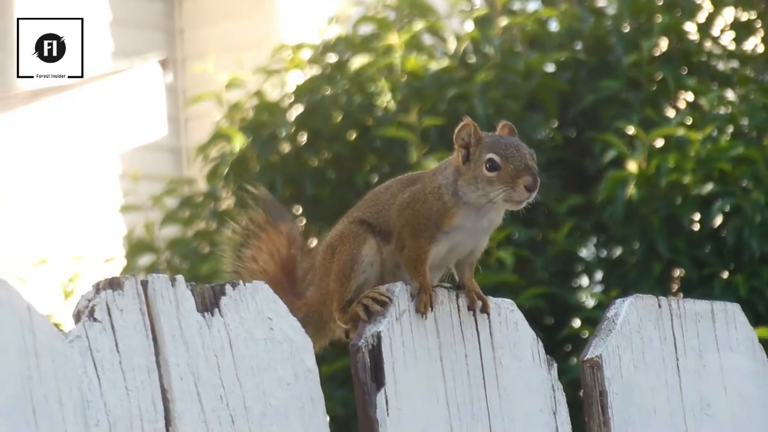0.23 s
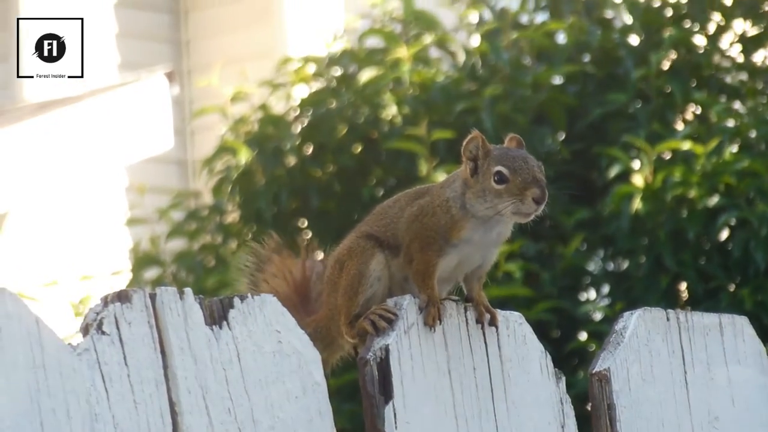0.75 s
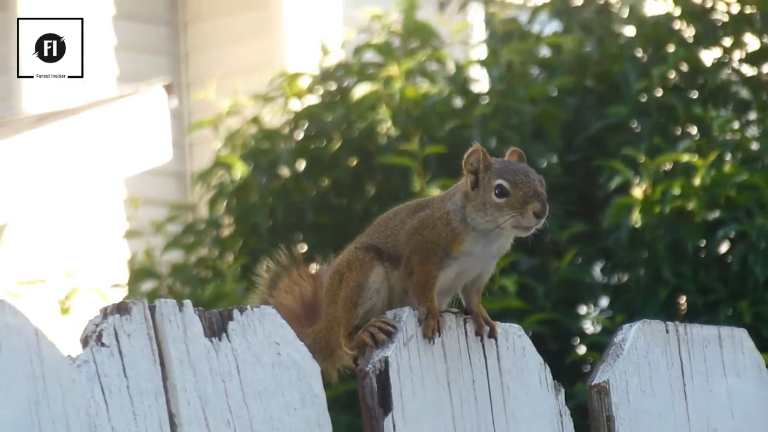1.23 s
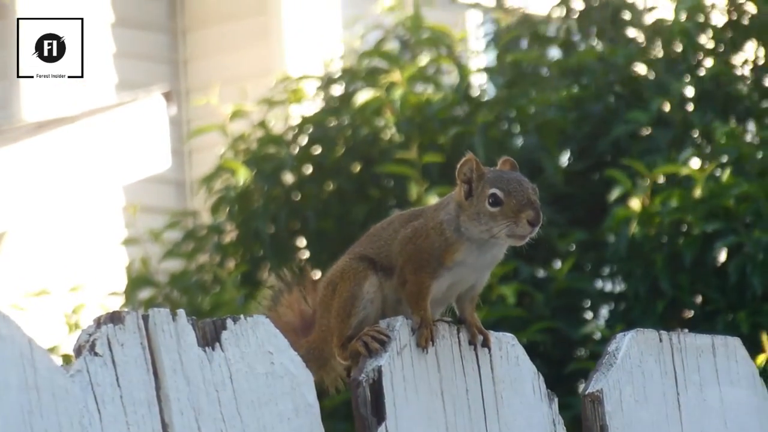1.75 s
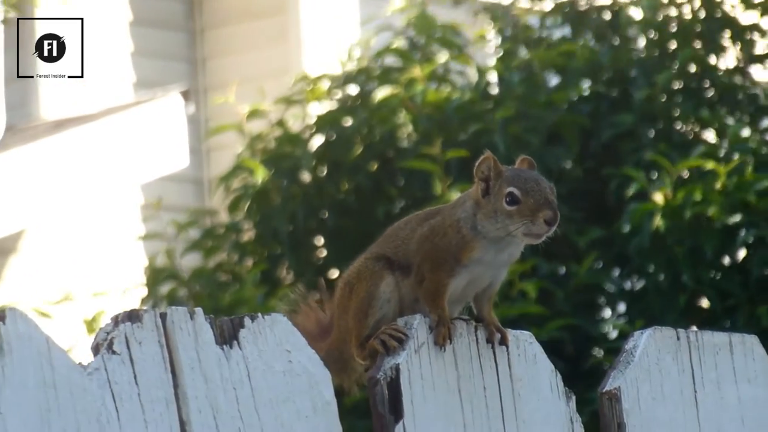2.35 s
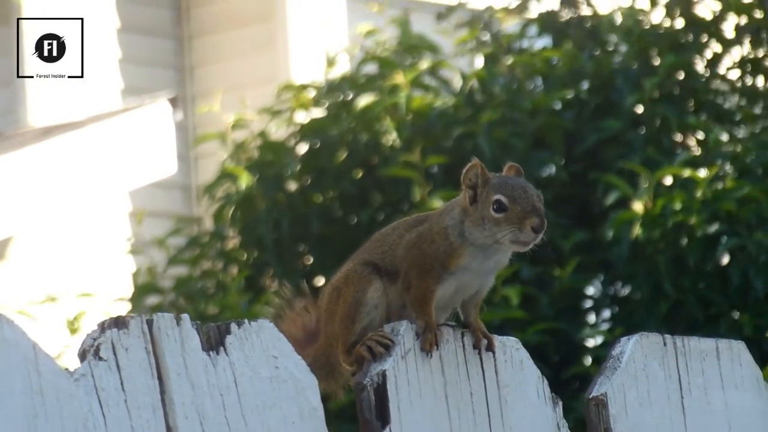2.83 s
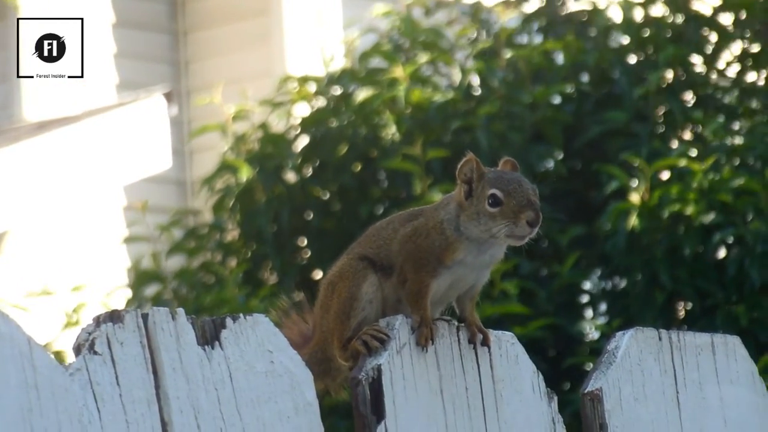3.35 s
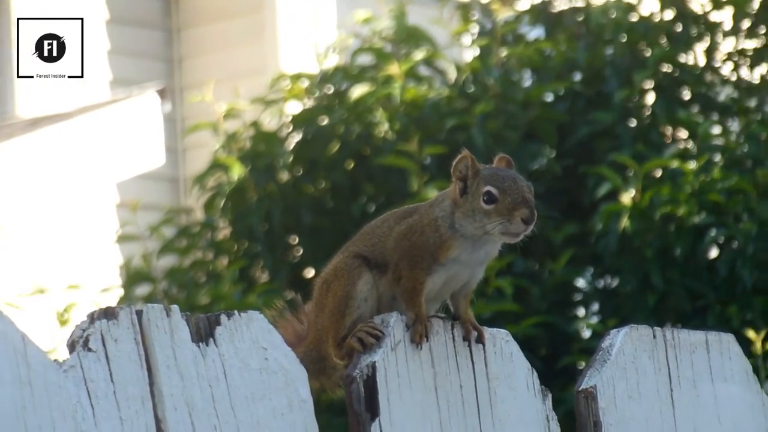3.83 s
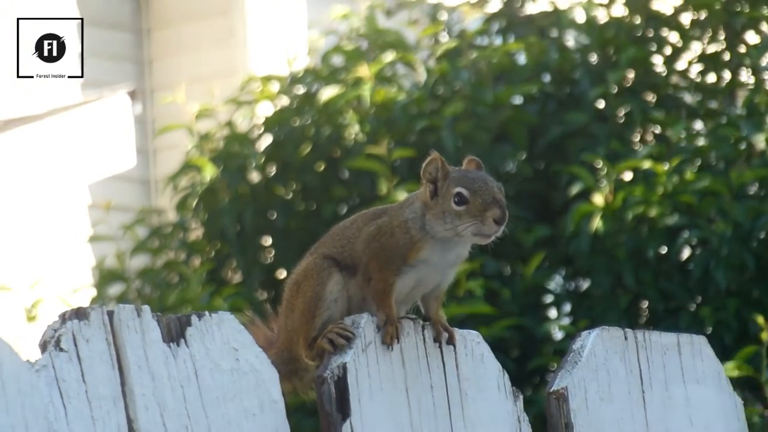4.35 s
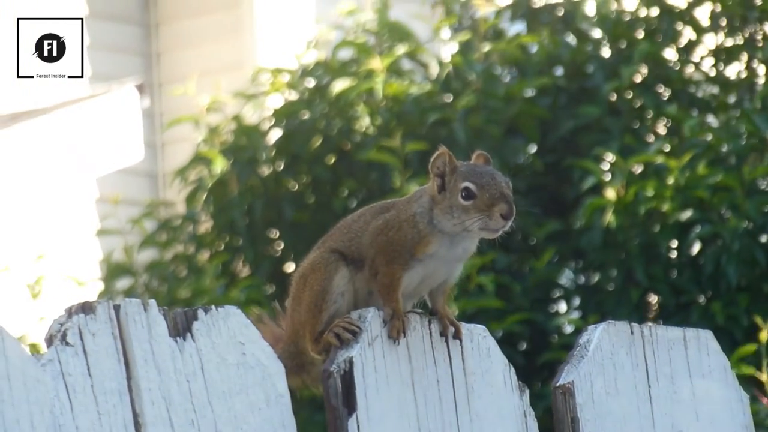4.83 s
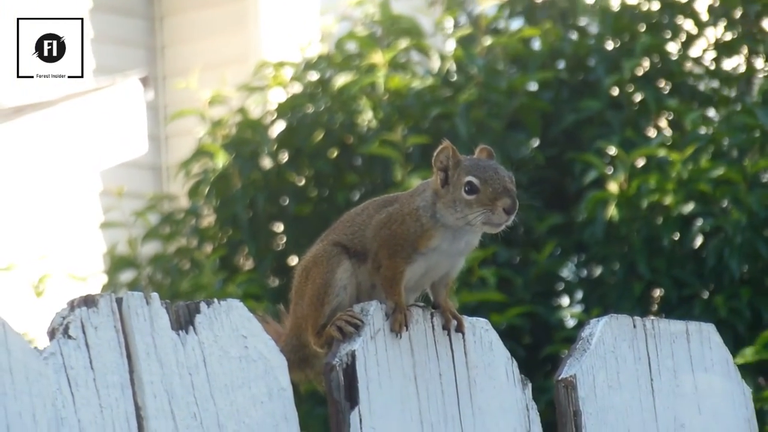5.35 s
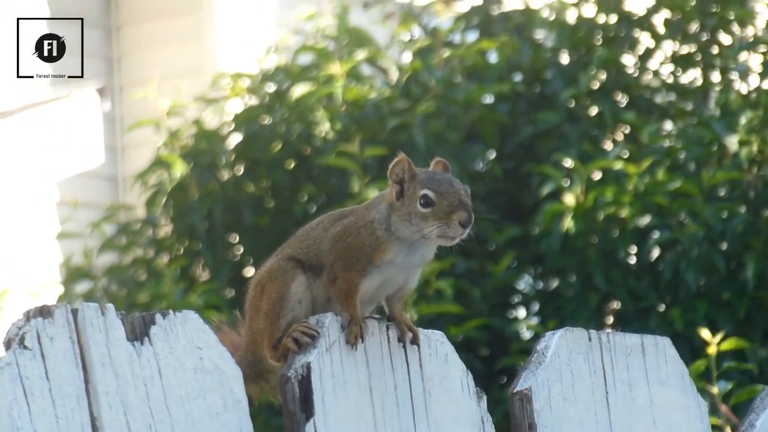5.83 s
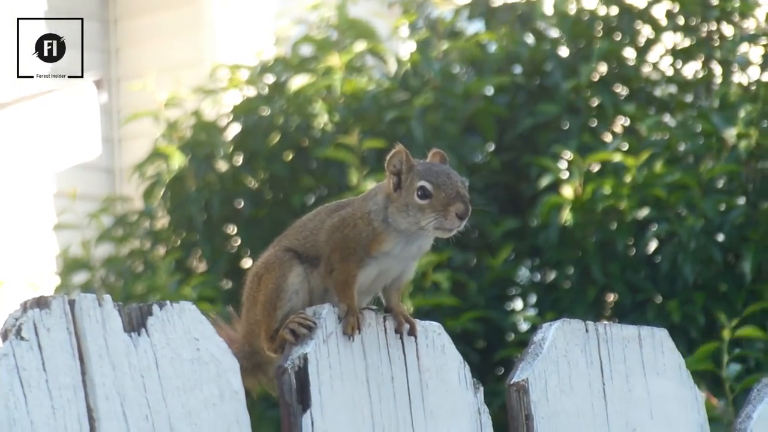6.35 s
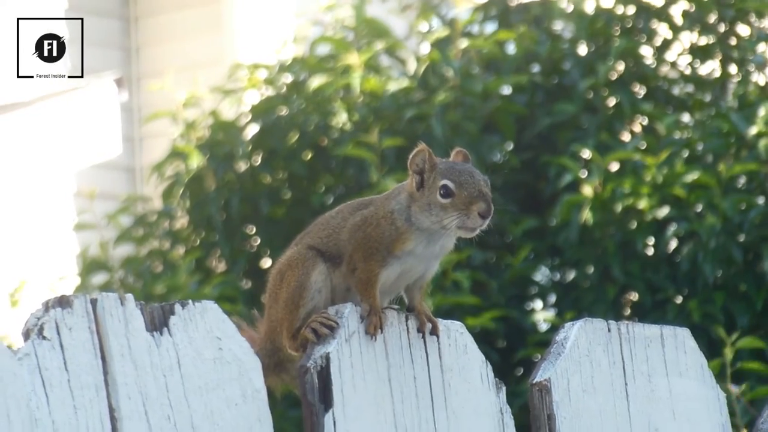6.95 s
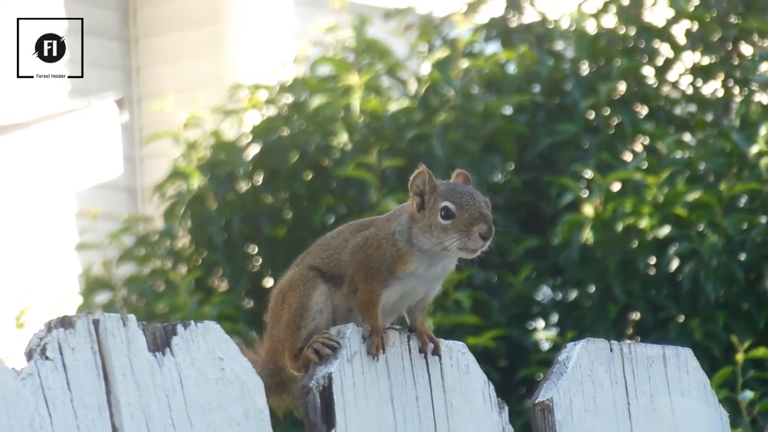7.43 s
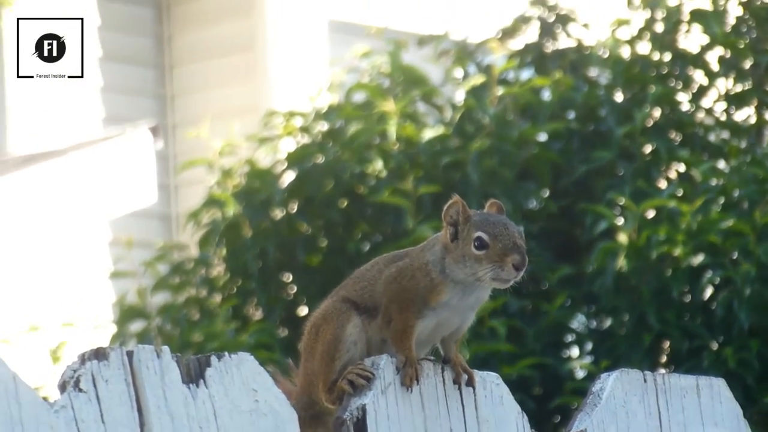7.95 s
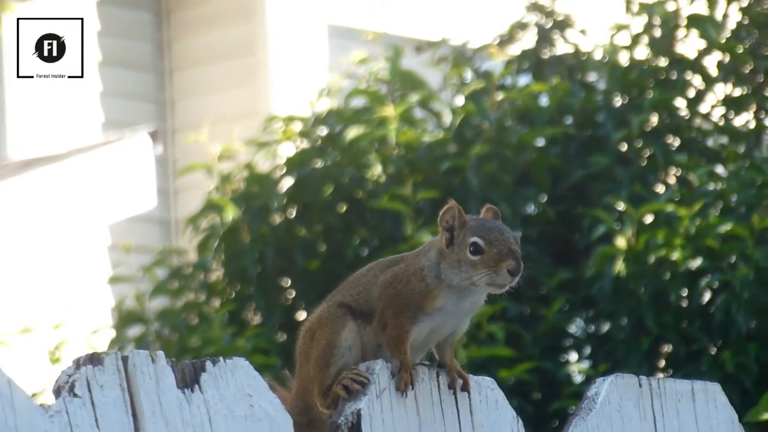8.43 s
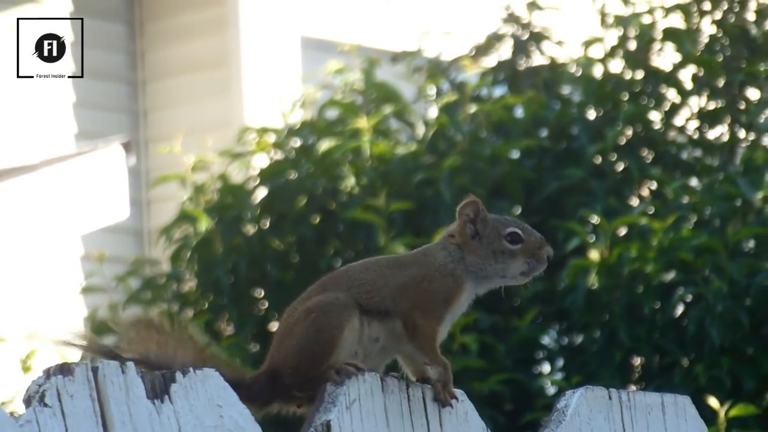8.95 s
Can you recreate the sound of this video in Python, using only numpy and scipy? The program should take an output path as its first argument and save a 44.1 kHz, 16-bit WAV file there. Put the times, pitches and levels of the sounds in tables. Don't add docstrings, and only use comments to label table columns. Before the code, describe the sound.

A close stereo camera microphone outdoors hears a squirrel scolding from a wooden fence, house walls returning short bright echoes. At 0-0.5 s finger taps, low wind thumps, a brief dropout and a loud clicky scrap accompany the first calls. Each call lasts about a tenth of a second: a thin whistle scooping up near 6 kHz, sometimes cracking into a higher hoarse yelp, usually ending in a raspy bark. They come two or three per second at first. Faint dry insect ticks run at 1.2 and 2 s; claws scratch boards at 1.2, 2.2 and 2.6 s. From 2.6 to 3.1 s a soft nasal whine rises, holds and sinks. Calls continue less regularly, weaker and huskier after 5 s. Wind pops at 5.1 and 6.1 s, then buffets heavily from 6.7 to 7.9 s, easing with smaller thumps until 8.5 s. Final chirps and a bark close near 9 s over distant town hum and faint hiss.

```python
import sys
import numpy as np
from scipy import signal
from scipy.fft import rfft, irfft, next_fast_len
from scipy.io import wavfile
from scipy.ndimage import uniform_filter1d, map_coordinates

SR = 44100
rng = np.random.default_rng(int(sys.argv[2]) if len(sys.argv) > 2 else 0)


def field_ratio(decibels):
    return 10 ** (np.asarray(decibels, dtype=float) / 20)


def pcm_store(signal):
    levels = np.round(np.clip(np.atleast_2d(signal), -1, 1) * 32767)
    wavfile.write(sys.argv[1], SR, levels.astype(np.int16).T)


N = 405279
T = np.arange(N) / SR


def unit(x):
    return x / np.sqrt(np.mean(x ** 2) + 1e-20)


def along(points, hz):
    f, v = np.transpose(points)
    return np.interp(np.log(hz + 1), np.log(f + 1), v)


def wobble(rate):
    return unit(map_coordinates(rng.standard_normal(int(N * rate / SR) + 4), [T * rate]))


def filtered(x, response):
    m = next_fast_len(N + SR // 2)
    return irfft(rfft(x, m) * response(np.fft.rfftfreq(m, 1 / SR)), m)[..., :N]


def resonant(x, modes, order=1):
    def body(f):
        total = 0
        for k, (centre, width, db) in enumerate(modes):
            ring = 1j * f * width / (centre * centre - f * f + 1j * f * width)
            total = total + (-1) ** k * field_ratio(db) * ring ** order
        return total
    return unit(filtered(x, body))


def swell(s, length, rise, fall):
    at = np.arange(round(s * SR), min(N, round((s + length + 8 * fall) * SR)))
    t = at / SR - s
    return at, t, np.clip(t / rise, 0, 1) * np.exp(-np.clip(t - length, 0, None) / fall)


def rush(spectrum, alike, patchy_db):
    z = signal.stft(rng.standard_normal((2, N + 512)), nperseg=512)[2]
    field = uniform_filter1d(rng.standard_normal(z.shape[1:]), size=6, axis=0)
    field = uniform_filter1d(field, size=14, axis=1)
    pair = signal.istft(z * field_ratio(patchy_db * unit(field)), nperseg=512)[1][:, :N]

    def shape(hz):
        turn = np.arccos(np.clip(along(alike, hz), -1, 1)) / 2
        return field_ratio(along(spectrum, hz)) * [np.cos(turn), np.sin(turn)]
    mid, side = filtered(pair, shape)
    return unit(np.array([mid + side, mid - side]))


def mottled(x, depth_db):
    z = signal.stft(x, nperseg=512)[2]
    field = uniform_filter1d(uniform_filter1d(rng.standard_normal(z.shape), size=5, axis=0), size=7, axis=1)
    return signal.istft(z * field_ratio(depth_db * unit(field) - 1), nperseg=512)[1][:N]


def ports(pan_db):
    return np.array([[min(pan_db, 0)], [min(-pan_db, 0)]])


# time in seconds, level in dB.
BUSTLE = [(0.0, -50), (1.02, -52), (2.1, -51.5), (2.7, -51), (3.5, -55.5), (4.5, -57), (5.3, -54.5),
          (7.01, -55), (9.19, -54)]
# frequency in Hz, level in dB per Hz.
HUM_COLOUR = [(12, -42.5), (20, -14.5), (262, -6.5), (390, -5), (426, -3.5), (556, -7.5), (650, -1.5),
              (926, -4.5), (1110, -5), (3070, -16.5), (4000, -29.5), (5200, -58.5), (8800, -120)]
# frequency in Hz, level in dB per Hz.
HISS_COLOUR = [(1760, -33.5), (3000, -6), (3340, -4.5), (4900, -6.5), (5430, -9), (7300, -11), (10800, -15),
               (13700, -17), (15000, -41)]
# frequency in Hz, likeness from 0 to 1.
LIKENESS = [(60, 0.9), (640, 0.89), (1400, 0.73), (3000, 0.44), (6000, 0)]


def town():
    bustle_db = np.interp(T, *np.transpose(BUSTLE))
    hum = field_ratio(bustle_db - 0.78 + 0.44 * wobble(4.4)) * rush(HUM_COLOUR, LIKENESS, patchy_db=2.0)
    hiss = field_ratio(bustle_db - 10.5) * rush(HISS_COLOUR, LIKENESS, patchy_db=4.5)
    phase = np.array([[0], [1]]) + .5 * wobble(60)
    line = field_ratio(-75.5 + 2 * wobble(12)) * np.sin(2 * np.pi * 13194 * T + phase)
    return hum + hiss + line


# time in seconds, level in dB.
BREEZE_LEVEL = [(0.0, -54), (0.33, -53), (0.43, -61.5), (0.97, -73.5), (1.61, -68), (2.38, -72.5),
                (6.04, -67.5), (6.19, -60.5), (6.58, -60), (6.89, -52), (7.22, -59), (7.5, -49),
                (7.68, -48), (7.98, -54.5), (8.27, -57), (9.19, -73.5)]
# time in seconds, peak in dB, left-right difference in dB.
SOFT_GUSTS = [(0.0, -44, 6), (0.68, -55.5, 1), (0.82, -56, 27), (4.57, -58, -4.5), (4.76, -53, 3),
              (6.3, -58.5, 13.5), (6.959, -36.5, 15), (7.161, -43.5, 21), (7.531, -28.5, -15),
              (7.82, -38.5, -3.5), (8.62, -54.5, 4.5), (8.95, -51, 2)]
# time in seconds, peak in dB, pitch in Hz, left-right in dB.
BURSTS = [(0.073, -31.5, 131, 19), (0.155, -18.5, 164, 2), (0.262, -21, 220, 13), (0.326, -24, 200, 24),
          (0.443, -32.5, 233, 8), (2.037, -33, 130, 15), (2.114, -41, 120, 24), (4.778, -43.5, 230, 7),
          (5.148, -32, 128, 13), (6.085, -31, 205, 14.5), (6.183, -34, 103, 8), (6.193, -23.5, 274, 24),
          (6.548, -34.5, 170, 19), (6.635, -46, 167, 13), (6.724, -16.5, 330, -26),
          (6.857, -33.5, 127.3, 8), (6.943, -22, 233, 27), (7.142, -29.5, 292, 29), (7.268, -28, 217, 29),
          (7.347, -29, 185.6, 27), (7.422, -25.5, 192, 39), (7.733, -17, 450, -28), (8.119, -31.5, 137, -9),
          (8.279, -38, 192, -13.5), (8.332, -30, 250, 35.5), (8.377, -36.5, 152, -4), (8.486, -39, 268, 22)]
# time in seconds, peak in dB, pitch in Hz, left-right in dB.
DIPS = [(0.148, -36, 150, 5), (0.1683, -23.5, 196, 10), (0.258, -27, 306, -15), (0.287, -39, 213, -13),
        (0.3007, -24, 285, -21), (0.31, -37, 230, 10), (0.361, -31, 294, -23), (6.241, -29, 290, 23),
        (6.2627, -29.5, 283, 20.5), (6.7362, -23, 382, -13), (6.747, -27, 185, -8), (6.754, -29, 262, 12),
        (6.7802, -28.5, 377, 18), (6.8065, -26.5, 254, 23), (6.925, -21, 312, 19), (6.957, -21, 330, 22),
        (6.9647, -25, 290, 20), (6.976, -38, 167, 16), (7.026, -31, 181, 18), (7.1688, -24, 320, 20.5),
        (7.1777, -24, 368, 25), (7.3253, -29.5, 237, 14), (7.374, -29, 277, 16), (7.384, -32, 193, 22),
        (7.3936, -37, 272, 19), (7.4397, -30.0, 237, 18), (7.463, -28, 233, 6), (7.488, -34, 114, -18),
        (7.494, -23, 253, -17), (7.5145, -22, 417, -18), (7.5267, -20, 408, -19), (7.5393, -19, 370, -24),
        (7.5528, -21, 313, -16), (7.5603, -21, 387, -23), (7.5754, -21.5, 334, -25),
        (7.5827, -32, 408, -21), (7.603, -25, 294, -19), (7.6313, -29, 165, 17), (7.662, -30, 212.4, -12),
        (7.73, -38, 253, -5), (7.755, -24, 130, -14), (7.7602, -22, 283, -21), (7.771, -19.5, 368, -15),
        (7.783, -30.5, 387, 5), (7.793, -27, 262, 8), (7.8164, -31, 320, -19), (7.823, -34, 327, -18),
        (7.836, -34, 175, -15), (7.8481, -24.5, 207, -18), (7.8601, -17, 340, -30)]
# frequency in Hz, level in dB per Hz.
BUFFET_COLOUR = [(20, -29), (60, -2.5), (170, 4.5), (330, -4), (500, -11.5), (800, -13), (1300, -52),
                 (2500, -120)]


def wind():
    sway_db = 1.4 * np.array([wobble(3.0), wobble(1.4)])
    level = field_ratio(np.interp(T, *np.transpose(BREEZE_LEVEL)) + sway_db - 4.5)
    gusts = [(s, db - 16.5, .55 * pan_db, 499.5, 156.5) for s, db, hz, pan_db in BURSTS]
    gusts += [(*gust, 172, 172) for gust in SOFT_GUSTS]
    for s, db, pan_db, rise, fall in gusts:
        near = slice(max(round((s - .4) * SR), 0), round((s + .4) * SR))
        loss_db = np.maximum(rise * (s - T[near]), fall * (T[near] - s))
        level[:, near] += field_ratio(db + ports(pan_db) - loss_db)

    deep = [(20, 2.0), (90, 9.0), (190, -7.0), (300, -20.0), (600, -74)]
    lull = np.minimum(level, field_ratio(-48.0)) * rush(deep, [(30, 0.94), (100, 0.37)], patchy_db=0)
    chance, size = rng.random((2, N)), rng.standard_normal((2, N))
    eddies = (chance < 170 / SR) * np.sign(size) * field_ratio(2.5 * np.abs(size))
    out = lull + level * unit(filtered(eddies, lambda hz: field_ratio(along(BUFFET_COLOUR, hz))))

    for s, db, hz, pan_db in BURSTS:
        at, t, env = swell(s + .002, .004, rise=.003, fall=.002)
        cycles = hz * 1.27 * t * (1 - 18 * t)
        out[:, at] += field_ratio(db + 2.5 + ports(pan_db)) * env * np.sin(2 * np.pi * cycles)
    for s, db, hz, pan_db in DIPS:
        near = slice(round((s - .01) * SR), round((s + .01) * SR))
        u = (np.pi * .85 * hz * (T[near] - s)) ** 2
        out[:, near] -= field_ratio(db + ports(pan_db)) * (1 - 2 * u) * np.exp(-u)
    return out


# start in seconds, level in dB.
TICK_RUNS = [(1.235, -57), (1.994, -52.5)]


def insect():
    push = np.zeros(N)
    for s, db in TICK_RUNS:
        for k, size in enumerate(np.hanning(11)[1:-1]):
            at, t, env = swell(s + k * 0.034, 0.003, rise=.001, fall=0.0021)
            push[at] += field_ratio(db) * np.sqrt(size) * env
    return push * resonant(rng.standard_normal(N), [(8720, 990, -3.0), (3220, 580, 1.5)])


# frequency in Hz, seconds to fall 60 dB.
WALL_DECAY = [(1000, 0.046), (2400, 0.14), (2950, 0.22), (3600, 0.16), (4500, 0.17), (6700, 0.11),
              (11000, 0.083)]
# frequency in Hz, share of the difference kept.
WALL_SPREAD = [(1000, .45), (3000, .6), (6000, 1)]


def walls(x):
    out, size = np.zeros((2, N + SR)), SR // 3
    for start in range(0, N, size):
        hz, t, z = signal.stft(rng.standard_normal((2, SR // 2)), SR, nperseg=128)
        t60 = along(WALL_DECAY, hz)[:, None]
        decay = field_ratio(-60 * t / t60) + field_ratio(-19.5 - 60 * t / (3.4 * t60))
        tail = signal.istft(z * decay, SR, nperseg=128)[1]
        wet = signal.fftconvolve(x[None, start:start + size], tail / np.linalg.norm(tail[0]), axes=1)
        out[:, start + 200:start + 200 + wet.shape[1]] += wet
    out = out[:, :N]
    middle = out.mean(axis=0)
    return filtered(out - middle, lambda hz: along(WALL_SPREAD, hz)) + middle


# time in seconds, peak in dB, pitch in Hz.
SHELL_TAPS = [(.0072, -33, 1280), (0.0193, -17.5, 1180), (.0243, -44, 1500), (0.082, -35, 400)]


def taps():
    out = np.zeros(N)
    for s, db, hz in SHELL_TAPS:
        at, t, env = swell(s, 0, rise=.0001, fall=.0012)
        out[at] -= field_ratio(db + 2) * env * np.cos(2 * np.pi * hz * .0012 * (1 - np.exp(-t / .0012)))
    return out


# time in seconds, grit level in dB, wood level over it in dB.
SCRAPES = [(0.0, -42, -9), (0.004, -41, 10), (0.0207, -42, 12), (0.081, -48.5, 7), (1.2361, -57, 17),
           (1.2528, -45.5, 8.5), (2.2023, -75, -9), (2.2133, -39.5, -3), (2.216, -45, 1),
           (2.226, -44.5, 10), (2.2302, -55, 0), (2.239, -53, 13), (2.5593, -47.5, 2), (2.574, -46, 12.5)]
# frequency in Hz, width in Hz, level in dB.
BOARD_RINGS = [(1208, 390, 0), (3440, 400, 9.5), (8600, 1500, 9.5), (12700, 1100, 4)]


def claws():
    push = np.zeros((2, N))
    for s, db, wood_db in SCRAPES:
        at, t, env = swell(s, 0.0017, rise=0.000875, fall=0.0051)
        push[:, at] += field_ratio([[db - 1.0], [db + wood_db - 11.0]]) * env
    grit = rng.standard_normal(N) * field_ratio(1.7 * wobble(900))
    return push[0] * resonant(grit, BOARD_RINGS[1:]) + push[1] * resonant(grit, BOARD_RINGS[:1])


# time in seconds, pitch in Hz, level in dB.
WHINE_PATH = [(2.571, 630, -59), (2.588, 800, -52), (2.62, 847, -44.5), (2.72, 865, -48.5),
              (2.8, 858, -45.5), (2.92, 838.5, -45.5), (3.05, 787, -51), (3.09, 789, -58), (3.2, 781, -68)]
# multiple of the pitch, level in dB.
NOSE_PARTIALS = [(1, -26), (2, -10), (3, -8), (4, 0), (5, -36), (6, -24), (7, -25), (8, -29), (9, -36),
                 (10, -35), (11, -42), (12, -37), (14, -36)]
# times in seconds, lift in dB.
MOUTH_OPENING = [2.72, 2.79, 2.88, 2.93], [-5, 2.5, 1.5, -3]


def whine():
    s, hz, db = np.transpose(WHINE_PATH)
    unsteady = np.interp(T, [2.58, 2.62, 2.9, 3.0], [.035, .005, .006, .016])
    pitch = np.interp(T, s, hz) * (1 + 0.004 * wobble(80) + unsteady * wobble(600))
    turn = 2 * np.pi * np.cumsum(pitch) / SR
    waver_db = np.interp(T, [2.85, 3.0], [3.2, 5])
    stack = np.zeros(N)
    for k, level in NOSE_PARTIALS:
        lift_db = (k == 3) * np.interp(T, *MOUTH_OPENING)
        level_db = level + lift_db + waver_db * min(k / 4, 1) * wobble(90)
        stack += field_ratio(level_db) * np.sin(k * turn + k * k)
    return field_ratio(np.interp(T, s, db, left=-120, right=-120) + 9.0) * stack


# start in seconds, length in seconds, pitch in Hz, level in dB.
MOUTH_RINGS = [(0.0, 0.0085, 2897, -43), (0.019, 0.0034, 2896, -37), (0.024, 0.28, 2843, -61.5),
               (3.99, 0.028, 3040, -51), (5.716, 0.057, 3050, -54), (6.005, 0.051, 3210, -50.5),
               (6.206, 0.0026, 3150, -47.5), (6.208, .03, 3210, -69), (6.398, 0.03, 3180, -60),
               (4.342, 0.024, 2960, -58), (6.77, 0.02, 2900, -57.5)]


def undertones():
    out, shake, throb = np.zeros(N), wobble(500), wobble(150)
    for s, length, hz, db in MOUTH_RINGS:
        at, t, env = swell(s, length, rise=.002, fall=.004)
        tone = np.sin(2 * np.pi * hz * t + .5 * shake[at])
        out[at] += field_ratio(db + 3 + 2.5 * throb[at]) * env * tone
    return out


# start in seconds, length in seconds, rasp in dB, voice over the rasp in dB.
HARSH_BARKS = [(0.218, 0.031, -34.5, 4), (0.478, 0.026, -35, -0.5), (0.911, 0.028, -36.5, 2),
               (1.523, 0.027, -38, 1), (1.821, 0.043, -42.5, 3.5), (2.289, 0.04, -41, 2.5),
               (2.949, 0.028, -37.5, -0.5), (3.267, 0.028, -39.5, 2.5), (3.686, 0.023, -39, -0.5),
               (4.019, 0.029, -42, 2), (4.579, 0.029, -41.5, 2.5), (5.122, 0.042, -41.5, 2),
               (5.244, 0.044, -49, 3.5), (5.372, 0.02, -59.5, 13.5), (6.033, 0.038, -42, -3),
               (6.865, 0.057, -45.5, 1.5), (7.018, 0.048, -58.5, 11.5), (7.349, 0.043, -44, -2.5),
               (7.479, 0.045, -48, 4), (7.618, 0.048, -57, 12), (8.165, 0.036, -43.5, -1.5),
               (8.99, 0.048, -42.5, -2.5)]
# frequency in Hz, width in Hz, level in dB.
TIGHT_TRACT = [
    [(9300, 210, -6), (9810, 690, -0.5), (10640, 400, 7), (11680, 1100, 2.5), (12700, 400, -0.5),
     (13200, 770, -16), (4130, 200, -15.5), (10600, 9100, -5.5), (3600, 7100, -7.5)],
    [(2990, 437, 23), (2565, 210, 17)],
    [(1413, 420, 0)],
    [(6890, 660, 6.5), (7455, 150, 10.5), (5900, 620, -3)],
]
# frequency in Hz, width in Hz, level in dB.
SLACK_TRACT = [
    [(10130, 880, 0.5), (11000, 600, 1), (11500, 430, 4.5), (12380, 900, -5), (13240, 800, -9.5),
     (5400, 2000, -9)],
    [(2590, 315, -1), (3180, 300, 2), (3630, 410, -2)],
    [(1080, 62, 0), (1404, 160, -2.5), (810, 170, -5), (1710, 190, -18.5)],
    [(5060, 2600, -7), (6600, 530, 3.5), (7170, 1100, -6)],
]
# frequency in Hz, width in Hz, level in dB.
CLOSING_MOUTH = [
    [(2927, 150, 0)],
    [(2750, 190, 0)],
]


def barks():
    throat_db, closing_db, nose_db = (-8.5, -3.5, -5), (-16, -7.5, -13), (-4.5, -3.5)
    pushes, pitch = np.zeros((2, 5, N)), np.full(N, 1480.)
    voiced = np.array(HELD_WHISTLES + BREAKING_WHISTLES)[:, 0]
    for s, length, db, voice_db in HARSH_BARKS:
        alone = int(np.min(np.abs(s - voiced)) > .1)
        slack = int(alone or s > 5.2)
        state = slack + alone
        parts_db = [6, voice_db, voice_db + throat_db[state], voice_db + nose_db[slack],
                    voice_db + closing_db[state]]
        for part, (part_db, rise) in enumerate(zip(parts_db, (.011, .018, .019, .017, .016))):
            closing = part == 4
            fall = 0.012 if closing else 0.0086
            at, t, env = swell(s + .016 * closing, max(length * 0.5, rise), rise, fall)
            pushes[slack, part, at] += field_ratio(db + part_db + 7.5) * env * np.clip(t / rise, 0, 1) ** 0.39
        pitch[at] = 1480 - 400 * np.exp(-t / .008)
    pulses = np.diff(np.floor(np.cumsum(pitch * (1 + 0.065 * wobble(500))) / SR), prepend=0)
    noise, out = rng.standard_normal(N), np.zeros(N)
    tracts = TIGHT_TRACT + [CLOSING_MOUTH[0]], SLACK_TRACT + [CLOSING_MOUTH[1]]
    for push, tract, rough, steep in zip(pushes, tracts, (.68, .85), (2, 1)):
        source = np.sqrt(1 - rough) * unit(pulses - pulses.mean()) + np.sqrt(rough) * noise
        for p, modes in zip(push, tract):
            out += p * field_ratio(2.2 * wobble(260)) * resonant(source, modes, order=steep)
    return mottled(out, depth_db=1.8)


# start in seconds, length in seconds, pitch in Hz, level in dB, breath in dB.
HOARSE_YELPS = [(1.493, 0.021, 6640, -34, -22), (1.794, 0.02, 6660, -38.5, -22),
                (2.613, 0.012, 6690, -35, -20.5), (2.92, 0.02, 6700, -34, -19.5),
                (3.657, 0.023, 6720, -36.5, -22.5), (4.004, 0.022, 5970, -55, -6.5),
                (5.714, 0.045, 6650, -44, -19), (6.006, 0.026, 6410, -45.5, -14.5),
                (6.396, 0.034, 6450, -45, -31), (7.317, 0.031, 6740, -45, -17),
                (7.904, 0.022, 6890, -45, -18.5), (8.143, 0.026, 6600, -48, -5),
                (8.501, 0.041, 6620, -49.5, -7), (8.767, 0.022, 6720, -43.5, -17),
                (8.966, 0.018, 6660, -42, -14.5)]


def yelps():
    out, shake = np.zeros(N), wobble(1200)
    throb = np.sin(2 * np.pi * np.cumsum(210 * (1 + .3 * wobble(90))) / SR)
    breath = resonant(rng.standard_normal(N), [(5700, 1200, 3.3), (6740, 570, 13.0), (10600, 3000, 4.3),
                                               (11200, 1400, 8.5), (13050, 210, 2.1)])
    for s, length, hz, db, breath_db in HOARSE_YELPS:
        at, t, env = swell(s, length, rise=.003, fall=.006)
        env = env * (.65 + .35 * np.sin(np.pi * np.clip(t / length, 0, 1)))
        end_drop = .05 * np.clip((t - length + .006) / .012, 0, 1)
        turn = 2 * np.pi * np.cumsum(hz * (1.015 - .02 * t / length - end_drop + .007 * shake[at])) / SR
        tone = np.sin(turn)
        tone += field_ratio(-22) * np.sin(turn / 2 + 1.06 * shake[at])
        tone += field_ratio(-15.0) * np.sin(1.5 * turn) + field_ratio(-27.0) * np.sin(2 * turn)
        throbbing = 1 + np.clip(0.36 + 18 * t, 0, .6) * throb[at]
        out[at] += field_ratio(db + 11.5) * env * (throbbing * tone + field_ratio(breath_db + 6) * breath[at])
    return out


# start in seconds, length in seconds, pitch in Hz, level in dB,
# half-pitch tone in dB.
HELD_WHISTLES = [(0.141, 0.023, 5780, -32.5, -11.5), (0.164, 0.066, 5850, -36.5, -15),
                 (0.448, 0.028, 5700, -37, -21), (0.683, 0.03, 5710, -38.5, -30.5),
                 (0.872, 0.032, 5700, -37.5, -16.5), (2.249, 0.039, 5700, -38, -24),
                 (3.225, 0.035, 5904, -38.5, -17.5), (4.333, 0.026, 5960, -41, -26),
                 (4.541, 0.0283, 5880, -40.5, -20), (4.884, 0.033, 5940, -41, -18),
                 (5.086, 0.032, 5790, -41, -21), (6.597, 0.041, 5760, -49, -36),
                 (6.74, 0.049, 5774, -46.5, -36)]
# start in
# seconds, # length in seconds, pitch in Hz, level in dB, octave in dB.
BREAKING_WHISTLES = [(1.482, 0.023, 5890, -36, -7), (1.782, 0.024, 5840, -38.5, 1.5),
                     (2.599, 0.031, 5910, -36, -6.5), (2.91, 0.0087, 5880, -31.5, -0.5),
                     (3.648, 0.014, 5876, -31.5, -7.5), (3.974, 0.021, 5924, -36, -2),
                     (5.707, 0.026, 6050, -37, -6), (5.982, 0.026, 5990, -41.5, -6),
                     (6.206, 0.038, 5510, -50, -9.5), (6.378, 0.061, 5870, -47, 1.5),
                     (7.307, 0.044, 5950, -44, -1), (7.895, 0.029, 5920, -41.5, -21),
                     (8.122, 0.034, 6100, -42, -2), (8.758, 0.018, 6050, -36, -17),
                     (8.961, 0.011, 6300, -33.5, -23)]
# share below the pitch, time in seconds.
SCOOP_SHAPES = [
    (.29, .003),
    (.12, .012),
]


def whistles():
    out, shake, throb = np.zeros(N), wobble(1200), wobble(250)
    husk = wobble(300)
    fuzz = resonant(rng.standard_normal(N), [(5400, 700, 0), (8800, 600, -14), (11000, 900, -13)], order=2)
    calls = [(s, length, hz, db, 3.5, half_db) for s, length, hz, db, half_db in HELD_WHISTLES]
    calls += [(*row, -34) for row in BREAKING_WHISTLES]
    for s, length, hz, db, octave_db, half_db in calls:
        at, t, env = swell(s - .004, length + 0.000656, rise=0.006, fall=.003)
        late = np.clip((t - .02) / 0.006, 0, 1)
        split = np.clip((t - .008) / .014, 0, 1) ** 2
        scoop, scoop_s = SCOOP_SHAPES[int(s > 8.1)]
        low = scoop * np.exp(-t / scoop_s)
        low += .07 * late * np.clip((t - length + .005) / .011, 0, 1)
        bend = 1 - low + .3 * t * (1 - late) + .003 * shake[at] - .028 * late * np.abs(shake[at])
        turn = 2 * np.pi * np.cumsum(hz * bend) / SR
        tone = np.sin(turn) + field_ratio(octave_db - 3 - 150 * low) * np.sin(2 * turn + .25 * shake[at])
        tone += field_ratio(-17) * np.clip(t / .016, 0, 1) * fuzz[at]
        half = np.sin(np.pi * hz * 1.02 * t + .4 * throb[at] + .5 * shake[at])
        tone += split * field_ratio(half_db + 7 + 3 * husk[at]) * half
        tone += field_ratio(-24) * np.sin(1.5 * turn + .4 * shake[at])
        out[at] += field_ratio(db + 3 - 55 * low + (2 + 2 * late) * throb[at]) * env * tone
    return out


# delay in seconds, level in dB.
NEAR_BOUNCES = [(.004, -13), (.009, -14), (.017, -15), (.027, -17), (.038, -17)]
# frequency in Hz, left-right difference in dB.
PORT_LEAN = [(1000, 2), (4500, 2), (7300, 7.5), (8700, 1), (11000, 5.5), (13300, -10)]
# frequency in Hz, lag in radians.
PORT_LAG = [(3000, 0), (3900, .6), (5400, 1.0), (6200, 1.5), (7800, 2.4), (10000, 2.6), (12500, 4.2)]


def reach_ports(near):
    side = np.array([[.5], [-.5]])

    def path(hz):
        bounce = 1
        for s, db in NEAR_BOUNCES:
            bounce = bounce + field_ratio(db) * np.exp(-2j * np.pi * hz * s * (1 + 0.00515 * side))
        return bounce * field_ratio(side * along(PORT_LEAN, hz)) * np.exp(-1j * (side + .5) * along(PORT_LAG, hz))
    return filtered(near, path)


def scene():
    steady = whine()
    near = whistles() + yelps() + barks() + steady + claws() + insect() + undertones()
    near = filtered(near, lambda hz: 1 - .6 * np.exp(-((hz - 8400) / 260) ** 2))
    return reach_ports(near) + field_ratio(-3.5) * walls(near - .3 * steady) + wind() + town() + taps()


def top_cut(x):
    return signal.sosfilt(signal.butter(12, 15520, fs=SR, output="sos"), x)


# start in seconds, end in seconds, gain in dB.
GAIN_STEPS = [(.134, .1455, -16), (.1455, .1468, 8), (.1468, .1508, 2), (.1508, .1668, -26),
              (.1668, .169, 5), (.169, .176, 3)]


def record(dry):
    gain = np.ones(N)
    for start, stop, db in GAIN_STEPS:
        gain[round(start * SR):round(stop * SR)] = field_ratio(db)
    out = dry * gain
    # written at, length, taken from (seconds)
    at, size, source = (round(s * SR) for s in (.1881, .0037, .236))
    colour = [(2000, -22), (3000, -8), (5000, -14), (7400, 0), (9000, -6), (12000, 9), (14500, -4)]
    scrap = filtered(dry, lambda hz: field_ratio(along(colour, hz)))[:, source:source + size]
    out[:, at:at + size] = .85 * np.tanh(1.6 * scrap / np.abs(scrap).max()) / np.tanh(1.6)
    top = [(14150, 0.11), (14420, -28.5), (15500, -42)]
    mix = filtered(out, lambda hz: field_ratio(along(top, hz)))
    return top_cut(mix)


dry = scene()
out = record(dry)
pcm_store(out)
```